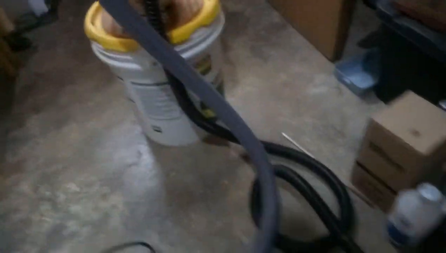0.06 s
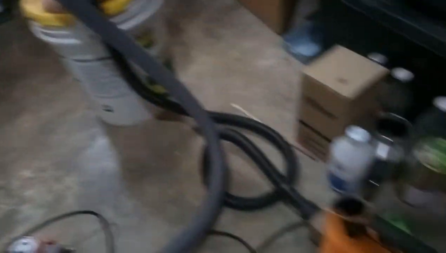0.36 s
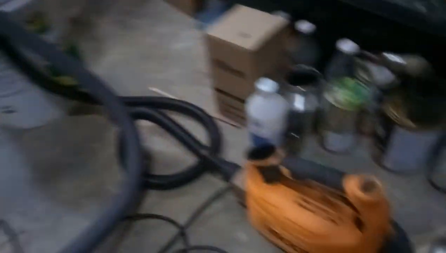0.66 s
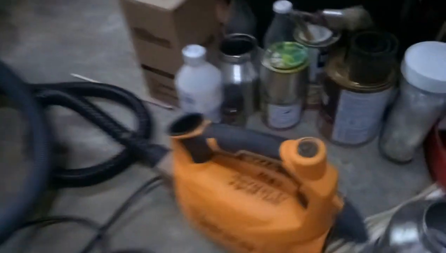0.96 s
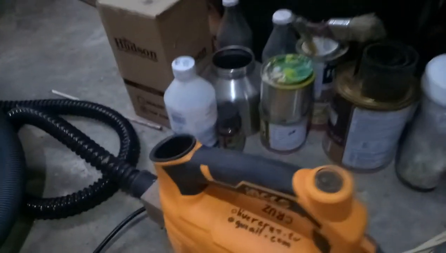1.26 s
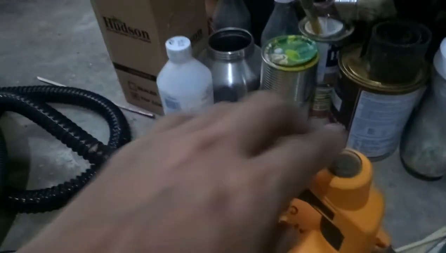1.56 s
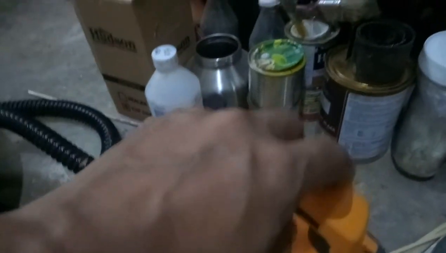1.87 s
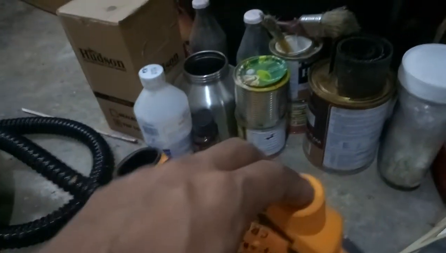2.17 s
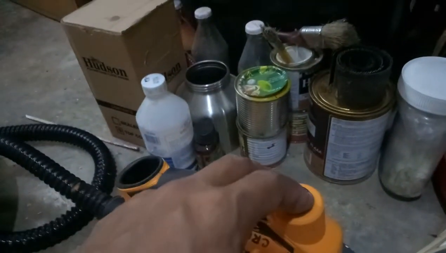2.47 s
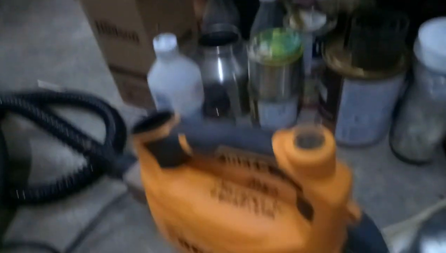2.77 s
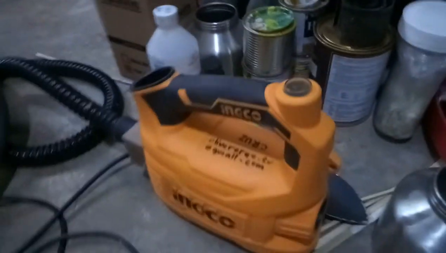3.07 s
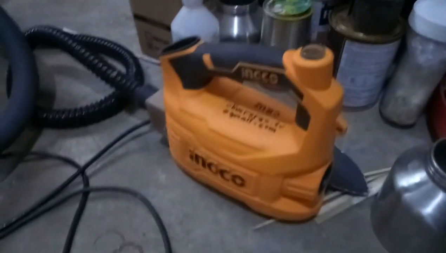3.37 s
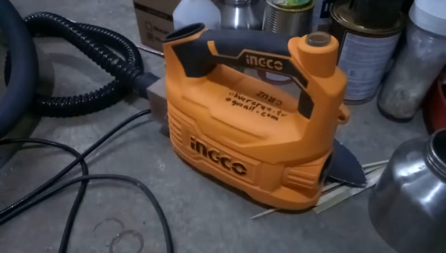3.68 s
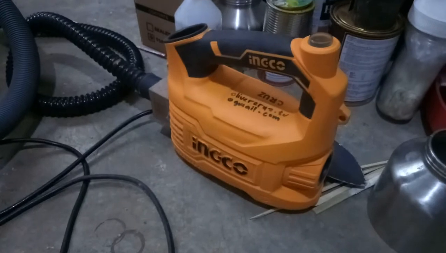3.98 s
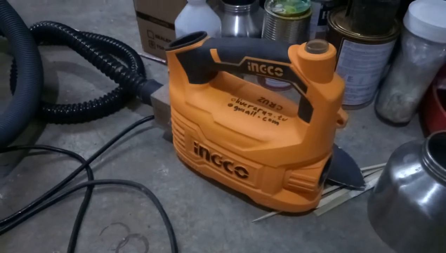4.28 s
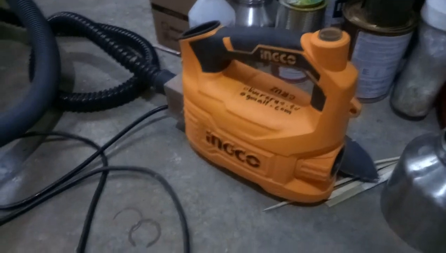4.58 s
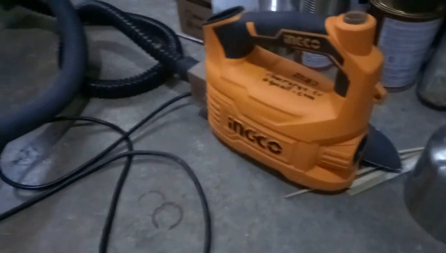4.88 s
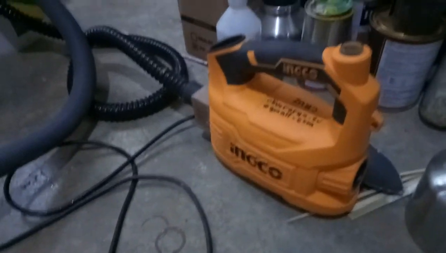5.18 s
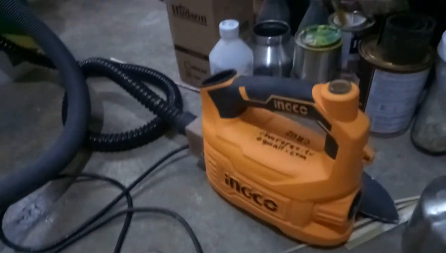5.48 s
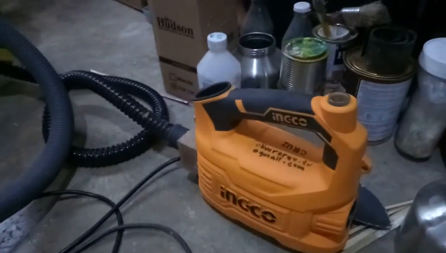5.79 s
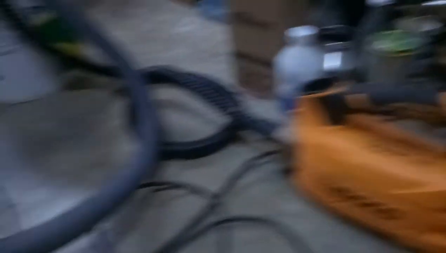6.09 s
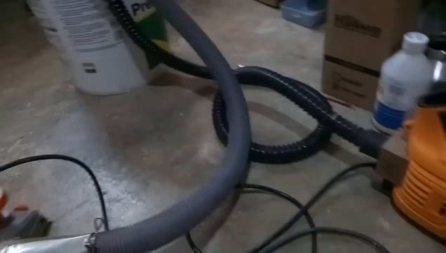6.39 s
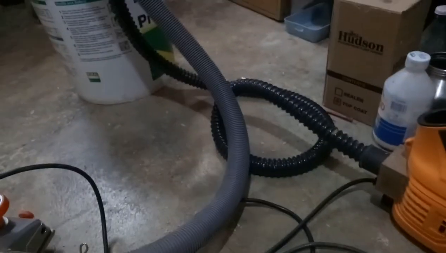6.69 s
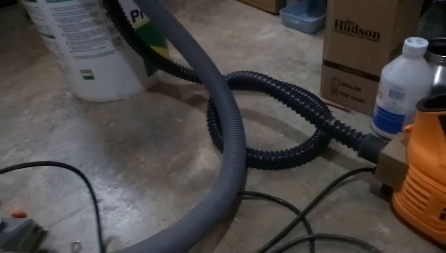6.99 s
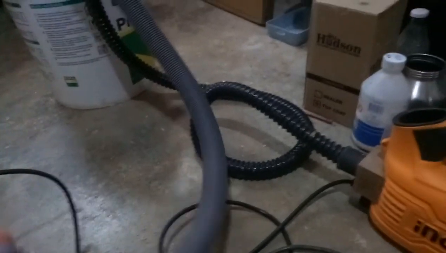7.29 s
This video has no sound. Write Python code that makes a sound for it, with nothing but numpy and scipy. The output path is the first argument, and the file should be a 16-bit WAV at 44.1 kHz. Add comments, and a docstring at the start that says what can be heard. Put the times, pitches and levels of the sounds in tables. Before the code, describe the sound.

A small electric blower, hosed up as a vacuum cleaner, starts after a quiet moment of shuffling, soft steps, mains buzz and a faraway engine. It clicks on with a brief raspy rising whir, then holds a steady whining tone over airy hiss. It is heard from nearby in a workshop on a hand-held microphone, whose late turn away shifts the hiss while the motor keeps running.

```python
"""Electric blower starting up

A hand-held blower, hosed to a bucket as a vacuum cleaner, is switched on in a small workshop, after
a mains buzz, a far idling engine and a shoe scuff. The commutator zips upwards under the inrush
current; then the unbalanced rotor sings at its shaft rate over turbulent air and brush hiss.
Near the end the listener, a hand-held pair of microphones, turns away and the case shades the hiss."""
import sys
import numpy as np
from scipy import signal
from scipy.fft import rfft, irfft, next_fast_len
from scipy.io import wavfile
from scipy.ndimage import map_coordinates

SR = 44100
rng = np.random.default_rng(int(sys.argv[2]) if len(sys.argv) > 2 else 0)


def bounce(signal):
    """Save signal as a 16-bit WAV file at the path given by the first command-line argument."""
    frames = np.transpose(np.atleast_2d(signal))
    limited = np.clip(frames, -1, 1)
    pcm = np.round(limited * 32767).astype(np.int16)
    wavfile.write(sys.argv[1], SR, pcm)


N = 332073
TIME = np.arange(N) / SR

SWITCH_S, FULL_HZ, BARS = 2.369, 583.4, 12  # switch-on, full shaft rate, commutator bars
HUM_HZ, HUM_CREST_S = 120, 2.458  # twice the mains rate, and one crest of its throb

# Spectra give densities per hertz. Levels are relative: each source applies its own gains.
# Third shaft harmonic in the room's standing waves: time_s, left_db, right_db, right_lead_rad
THIRD_HARMONIC = [(2.62, -31.5, -42, .8), (2.8, -24, -36, 2), (2.95, -29.5, -34, 2.2),
                  (3.35, -35.5, -33.5, 2.6), (4.45, -33, -32, 3.5), (4.85, -36.5, -35, 1.05),
                  (5.68, -34.5, -37.5, 1.4), (5.87, -34, -36, 3.3), (6.05, -24, -29, 2),
                  (6.4, -25.5, -48, 0.6), (7.53, -27.5, -42, .8)]
# Weaker shaft harmonics: multiple, left_db, right_db, turned_change_db
WEAK_HARMONICS = [(2, -41, -44.5, 1.5), (5, -50, -47, 1), (7, -42.5, -40, -5), (24, -65, -66, -7)]
# The listener's turn from the blower to the hoses: time_s, turned_share
LISTENER_TURN = [(5.85, 0.01), (6.35, 0.81)]
# Radiation of commutator tones by the case: pitch_hz, left_db, right_db
CASE_RESPONSE = [(600, -40, -42), (830, -24, -30), (1130, -18, -25), (1500, -25, -31), (2240, -23, -28),
                 (2750, -44, -40), (3100, -28, -21), (3320, -27, -14), (3530, -14.5, -10.5),
                 (3850, -29, -27), (4200, -22, -13.5), (4680, -29, -23), (5000, -42, -43), (5750, -54, -44),
                 (6350, -42, -46), (7200, -54, -60), (12000, -66, -68)]
# Overtones of the bar-passing tone: multiple, level_db
BAR_OVERTONES = [(2, -6), (3, -16), (4, -16)]
# Bar-passing whine at the moving listener: time_s, level_db
WHINE_LEVEL = [(2.62, -62), (2.75, -50), (2.83, -54), (2.94, -51), (3.05, -70), (4.55, -70), (4.8, -54),
               (5.2, -61), (5.85, -54), (6.3, -62), (7.4, -67)]
# Air in fan and hose, and the hose's hollow resonance: frequency_hz, left_db, right_db
RUSH_SPECTRUM = [(22, -12.5, -24.5), (45, -49, -36), (65, -35, -41.5), (108.7, -12.5, -16),
                 (178.7, 2, -3.5), (224, -4, -8), (308, 3, -1), (333, -6.5, -8.5), (422, -2, -16),
                 (478, -4.5, -3), (658, -3, -7), (880, -8.5, -12), (1140, -9.5, -24.5), (1970, -31.5, -26),
                 (5000, -100, -100)]
HOSE_SPECTRUM = [(600, -31, -33), (1120, -18.5, -15.5), (1680, -38.5, -43), (4000, -85, -86.5)]
# Hiss through the case: frequency_hz, left_db, right_db, left_turned_change_db, right_turned_change_db
HISS_SPECTRUM = [(950, -41.5, -56, 25, 4), (1365, -7.5, -26, -4, -15), (2220, -4, -6, 2.5, -5),
                 (2610, -14, -7, 4.5, -2), (3160, -16, -3.5, 10, 1), (3500, -11.5, -9, -21, -0.5),
                 (4100, -19.5, -4.5, 2, 3), (4600, -21, -9, 4, 0), (5450, -33, -15, -7, -2.5),
                 (6380, -17.5, -24.5, -4.5, 1.5), (7300, -54.5, -26, -6, -12), (8000, -45.5, -47, 9.5, -2),
                 (10780, -24.5, -28.5, -1, -4.5), (14600, -34, -40.5, -4, -3)]
# Phase lead of the hiss on the left, bent by floor and clutter: frequency_hz, facing_rad, turned_rad
HISS_LEAD = [(1000, -2.5, 1), (2200, -1, 2.6), (2770, -0.44, 1.9), (3500, 1.6, 2.6), (4300, .7, 1.9),
             (4800, 1, 2.7), (5950, 3.5, 3), (14000, 5, 3)]
# Resonances of vent and hose at the moving listener: time_s, centre_hz, left_db, right_db
VENT_RESONANCE = [(2.55, 4218, -42, -33), (3.2, 4080, -35.5, -31), (4.2, 4200, -39, -32.5),
                  (4.7, 4120, -36.5, -32.5), (5.35, 4180, -39, -33.5), (5.8, 4090, -42, -35),
                  (6.15, 4250, -47, -31), (6.52, 4520, -50, -35), (6.85, 4450, -50, -34.5),
                  (7.2, 4100, -50, -35.5)]
PIPE_RESONANCE = [(2.6, 1018, -45, -50), (3.1, 1150, -43, -46), (4.0, 1149, -43, -47),
                  (4.9, 1119, -35.5, -42), (5.8, 1149, -47, -45), (6.4, 1174, -38, -46)]
# Breathy hiss near 3.1 kHz that rises as the listener turns: time_s, centre_hz, left_db, right_db
RISING_BAND = [(3.0, 3100, -44, -44), (4.0, 3150, -45, -36.5), (4.55, 3128, -46, -34),
               (4.9, 3120, -51, -42), (5.399, 3165, -46, -46), (5.8, 2915, -53, -42), (6.1, 3090, -40, -32),
               (6.38, 3600, -54, -45), (6.6, 3690, -60, -58)]
# Sizzle around 6-8 kHz, brush sparks and the switch's crack: frequency_hz, left_db, right_db
SIZZLE_SPECTRUM = [(4000, -140, -140), (6350, -88.5, -92.5), (8320, -96.0, -94.0), (9100, -104, -104),
                   (15000, -140, -140)]
SPARK_SPECTRUM = [(500, -88, -90), (1050, -63, -70), (1500, -73, -80), (2250, -70, -74), (2800, -86, -84),
                  (3400, -81, -71), (3850, -87, -83), (4300, -82, -71), (5200, -99, -92),
                  (9000, -122, -120)]
CRACK_SPECTRUM = [(400, -84, -89), (950, -60, -65), (2400, -80, -82), (4300, -94, -80), (7500, -118, -116),
                  (14000, -132, -132)]
# The sizzle's beam at the moving listener: time_s, gain_db
SIZZLE_BEAM = [(2.6, 7), (3.2, -9.5), (4.4, -23), (4.8, 11), (5.9, 9), (6.4, 6)]
# Shoe scuffs, finger rubs, clothes rustles and footfalls: centre_s, length_s, level_db
SCUFF_STROKES = [(0.229, 0.012, 2.5), (.29, 0.16, -10), (.349, .01, -1), (.375, .07, -7), (0.42, 0.18, 2)]
RUB_STROKES = [(0.18, 0.18, -4.5), (0.75, 0.27, -11), (.98, 0.28, -17)]
CLOTH_STROKES = [(.27, 0.24, 1.5), (.62, 0.16, -8), (.88, 0.42, -6.5), (1.2, .25, -14), (1.66, 0.51, -11)]
STEP_STROKES = [(.73, .2, 0), (1.07, .14, -0.5)]
# Spectra of the same four contacts: frequency_hz, left_db, right_db
GRIT_SPECTRUM = [(300, -84, -98), (1200, -75.5, -90), (2300, -77.5, -82), (3400, -86, -75),
                 (4900, -93, -74.5), (6000, -94, -88), (7950, -107, -104), (14000, -106, -107)]
RUB_SPECTRUM = [(150, -95, -97), (230, -55, -61), (460, -78, -85), (604, -61, -67), (950, -79, -81),
                (2100, -91, -79), (3960, -120, -120)]
CLOTH_SPECTRUM = [(500, -85, -94), (900, -74, -76), (1400, -75, -89), (2320, -79, -78), (3000, -105, -94),
                  (7000, -125, -125)]
THUD_SPECTRUM = [(50, -79.5, -82.5), (85, -47, -55.5), (130, -75.5, -74), (330, -92, -94), (500, -69, -79),
                 (800, -99, -99), (1500, -130, -130)]
# Partials of an appliance's mains buzz: pitch_hz, level_db
BUZZ_PARTIALS = [(360.5, -45), (841, -66), (1081.5, -52), (1201.7, -62), (1321.8, -57), (1562.2, -56.5),
                 (1802.5, -58), (2042.8, -65)]
# Its upper partials at the moving listener: time_s, gain_db
BUZZ_TREBLE_GAIN = [(0, -7), (.5, -3.5), (.75, -8), (1.15, -8.5), (1.32, -4.5), (1.8, 0), (2.35, -2)]
# Partials of the far engine: pitch_hz, level_db, opening_lift_db
ENGINE_PARTIALS = [(63.7, -15.5, -5), (85, -16, -1), (104.4, -1, 4), (124, -9, 11.5), (165.5, -25, 3),
                   (184, -15, 4), (229.5, -17.5, 19)]
# Swells of the far engine: centre_s, length_s, level_db
ENGINE_SWELLS = [(.16, 0.42, -44), (.57, 0.19, -38), (.79, 0.24, -44), (1.17, .25, -49)]
# The room's low rumble and its air: frequency_hz, left_db, right_db
RUMBLE_SPECTRUM = [(25, -79.5, -83.5), (45, -70.5, -89), (89, -59, -65), (221, -67, -69.5),
                   (460, -76.5, -79.5), (730, -79, -79.5), (2500, -135, -135)]
AIR_SPECTRUM = [(497, -100, -100), (1010, -78, -81), (2020, -76.5, -89), (2860, -99, -86),
                (4500, -102, -86.5), (5480, -112, -99), (7400, -127, -125), (15000, -134, -134)]


def shaft_rate():
    """Exponential run-up in turns per second: a quick inrush kick, a slower rise, a slight late sag."""
    kick_share, kick_s, run_up_s = .28, .055, .196
    age = np.maximum(TIME - SWITCH_S, 0)
    shortfall = kick_share * np.exp(-age / kick_s) + (1 - kick_share) * np.exp(-age / run_up_s)
    sag_hz = .8 * np.clip(2 * (TIME - 6.3) + .5, 0, 1)
    return FULL_HZ * (1 - shortfall) - sag_hz


def rotor(hz, angle, turned):
    """Forced vibration: unbalance shakes the case once a turn; at speed the bearings add harmonics."""
    flutter_db = .5 * walk(8.2) + .59 * walk(35) + .97 * walk(140) + .45 * walk(3)
    note_db = stereo(-14.5, -20.5) + stereo(.17, -3) * turned + flutter_db
    tone = (hz / FULL_HZ) ** 1.8 * undb(note_db) * np.sin(angle + stereo(0, -.12))
    *third_db, lead = curve(THIRD_HARMONIC)
    tone += undb(np.array(third_db) + .58 * walk(45)) * np.sin(3 * angle + stereo(0, 1) * lead)
    ring_hz, half_width_hz = 1035, 63  # a case resonance, crossed on the way up
    for multiple, left_db, right_db, turned_db in WEAK_HARMONICS:
        onset = np.interp(hz, [450, 510] if multiple < 3 else [560, 580], [0, 1])
        ring_db = 8.5 * np.exp(-((multiple * hz - ring_hz) / half_width_hz) ** 2)
        for side, db in enumerate((left_db, right_db)):
            waver_db = 3.2 * walk(4) + 2 * walk(40)
            level = onset * undb(db + ring_db + turned_db * turned + waver_db)
            jitter = walk(1.977) + 1.1 * walk(60)
            tone[side] += level * np.sin(multiple * angle + jitter)
    return np.sqrt(2) * ramp(hz, 345, span=70) * tone


def commutator(hz, angle):
    """Periodic impact: bars rattle under the brushes, driven by an inrush that throbs with the mains."""
    current = np.clip(1 - hz / FULL_HZ, 0, 1) ** .47  # back voltage chokes it as speed rises
    bar_hz, bar_angle = BARS * hz, BARS * angle
    roughness = np.interp(hz, [90, 240], [.6, .3])
    zing_db = response(CASE_RESPONSE, bar_hz) + 4 * roughness * walk(300)
    zing = undb(zing_db) * np.sin(bar_angle + stereo(1, 0) + roughness * walk(700))
    overtones = 0
    for multiple, db in BAR_OVERTONES:
        level = undb(response(CASE_RESPONSE, multiple * bar_hz) + db)
        overtones += level * np.sin(multiple * bar_angle + roughness * walk(500))
    overtones *= np.interp(hz, [30, 100, 185, 260], [0, 1, 1, 0])
    rattle = np.sqrt(2) * current * throb(depth=.48) * (zing + overtones)
    return workshop(rattle, wet_db=-4, t60_s=.08) * (TIME > SWITCH_S)


def airflow(hz, turned):
    """Turbulence in fan and hose grows as a power of speed and is shaded as the listener turns."""
    drive = ramp(hz, 0, span=420) ** 1.9
    air = lagged(colour(noise_pair(apart=.05), RUSH_SPECTRUM), lag_ms=.12)
    rush = signal.sosfiltfilt(signal.butter(2, 500, fs=SR, output="sos"), air)
    whoosh = air - rush + colour(noise_pair(apart=.96), HOSE_SPECTRUM)
    gusts = undb(.5 * walk(14))
    return drive * gusts * (rush * undb(-49 - 3 * turned) + whoosh * undb(-47.5 - 4.5 * turned))


def brushes(hz, angle, turned):
    """Acoustic shadow: brush and vent hiss, pulsing once a turn, is recoloured as the listener turns."""
    drive = ramp(hz, 0, span=420) ** 1.7
    pulsing = drive * (1 + .17 * np.cos(angle)) * undb(.7 * walk(220) + .45 * walk(13))
    facing = phase_lagged(noise_pair(apart=.5) * pulsing, HISS_LEAD, column=0)
    away = phase_lagged(noise_pair(apart=.47) * pulsing, HISS_LEAD, column=1)
    facing = np.cos(turned * np.pi / 2) * colour(facing, HISS_SPECTRUM)
    away = np.sin(turned * np.pi / 2) * colour(away, HISS_SPECTRUM, turned=True)
    hiss = standing_waves(facing + away)
    treble = signal.sosfiltfilt(signal.butter(4, 6500, "high", fs=SR, output="sos"), hiss)
    treble_gain = drive ** 2 * undb(.5 + walk(2.09))  # the finest hiss needs high speed
    return (hiss + treble * (treble_gain - 1)) * undb(-56)


def breathy_band(hz, table, width_hz, left_lead_rad):
    """Narrow-band noise: hiss gathered about a wandering centre is heard as a breathy pitch."""
    centre_hz, *level_db = curve(table)
    centre_hz = centre_hz + .15 * width_hz * walk(9)
    noise = noise_pair(apart=.2) + 1j * noise_pair(apart=.2)
    breath = signal.sosfilt(signal.butter(2, width_hz / 2, fs=SR, output="sos"), noise)
    band = np.real(breath * np.exp(1j * (phase(centre_hz) + stereo(1, 0) * left_lead_rad)))
    return band / np.std(band) * undb(level_db) * ramp(hz, 300, span=130)


def coils(hz):
    """Magnetic force from the inrush current makes the field coils hum at twice the mains rate."""
    current = np.clip(1 - hz / FULL_HZ, 0, 1) ** .5 * ramp(TIME, SWITCH_S, span=.17)
    return np.sqrt(2) * undb(stereo(-30.5, -36)) * current * np.sin(2 * np.pi * HUM_HZ * TIME)


def sparks(hz):
    """Arcing at the brushes gives rough bursts of noise while the rotor is still slow."""
    slow = np.interp(hz, [0, 50, 220, 380], [0, 1, 1, 0])
    bursts = throb(depth=.5) * undb(3.5 * walk(450))
    return colour(noise_pair(apart=.33) * slow * bursts, SPARK_SPECTRUM)


def whine(hz, angle):
    """At speed the bars leave a thin tone at their passing rate, broadened by phase modulation."""
    scatter_rad = np.interp(hz, [560, 580], [.9, .35])
    tone = np.array([undb(3 * walk(25)) * np.sin(BARS * angle + walk(2) + scatter_rad * walk(160))
                     for side in range(2)])
    return np.sqrt(2) * undb(curve(WHINE_LEVEL)[0]) * ramp(hz, 380, span=60) * tone


def sizzle(hz):
    """Directivity: a band of sizzle around 6-8 kHz comes and goes as the listener moves."""
    band = colour(noise_pair(apart=.69), SIZZLE_SPECTRUM)
    return band * undb(curve(SIZZLE_BEAM)[0]) * ramp(hz, 300, span=200)


def switch():
    """Impact: the switch snaps shut with a plastic crack that decays exponentially."""
    age = np.maximum(TIME - SWITCH_S, 0)
    return colour(noise_pair(apart=.26) * (age > 0) * np.exp(-age / .065), CRACK_SPECTRUM)


def shoe():
    """Sliding friction: a sole clicks down, drags over gritty concrete and squeaks once."""
    grain_db = 2.6 * walk(600)
    grit = colour(noise_pair(apart=1) * strokes(SCUFF_STROKES) * undb(grain_db), GRIT_SPECTRUM)
    slip = ramp(TIME, .312, span=.02)
    squeak_hz = 3300 + 1100 * np.sin(slip * np.pi / 2)
    envelope = np.abs(np.sin(np.pi * slip)) ** .7 * undb(3 * walk(300))
    squeak = envelope * np.sin(phase(squeak_hz) + .5 * walk(900))
    return workshop(grit + squeak * undb(stereo(-44, -37)), wet_db=-6, t60_s=.4)


def handling():
    """Contact noise: fingers rub the microphones' housing, clothes rustle and feet come down softly."""
    rubs = colour(noise_pair(apart=.11) * strokes(RUB_STROKES) * undb(2 * walk(48.8)), RUB_SPECTRUM)
    cloth = colour(noise_pair(apart=.88) * strokes(CLOTH_STROKES) * undb(2 * walk(25)), CLOTH_SPECTRUM)
    cloth = standing_waves(cloth)
    steps = colour(noise_pair(apart=.05) * strokes(STEP_STROKES), THUD_SPECTRUM)
    return rubs + cloth + steps


def mains_buzz():
    """An appliance buzzes on harmonics of the rectified mains; the lowest grows as the listener nears."""
    near_db = np.interp(TIME, [0, 3.1], [-5, 0])
    treble_db = curve(BUZZ_TREBLE_GAIN)[0]
    buzz = 0
    for hz, db in BUZZ_PARTIALS:
        drift_db = near_db + .7 * walk(4.6) if hz < 500 else treble_db + 2 * walk(5.3)
        buzz += undb(db + drift_db) * np.sin(2 * np.pi * hz * TIME)
    return lagged(np.sqrt(2) * buzz * undb(stereo(1, -2.5)), lag_ms=-.1)


def far_engine():
    """An engine idling far outside radiates a low line spectrum that drones, swells and settles."""
    drone = np.interp(TIME, [.18, .5], [1, 0])
    idle = 0
    for hz, db, lift_db in ENGINE_PARTIALS:
        level = undb(db + lift_db * drone + .87 * walk(5.1))
        idle += level * np.sin(2 * np.pi * hz * TIME + .54 * walk(7))
    envelope = undb(-51) + strokes(ENGINE_SWELLS)
    return lagged(np.sqrt(2) * idle * envelope * undb(stereo(1, -2.5)), lag_ms=-.33)


def room_murmur():
    """Ambient noise: a nearly coherent rumble and diffuse air die down to a steady floor."""
    murmur_db = -4 + 8 * np.exp(-TIME / .93) + .48 * walk(11)
    rumble = lagged(colour(noise_pair(apart=.043), RUMBLE_SPECTRUM), lag_ms=-.36)
    air = colour(noise_pair(apart=1), AIR_SPECTRUM)
    return rumble * undb(murmur_db) + air * undb(.63 * murmur_db)


def workshop(x, wet_db, t60_s):
    """Reverberation: dense reflections from floor and clutter join the direct sound at constant power."""
    t = TIME[:SR // 2]
    tail = rng.standard_normal((2, len(t))) * undb(-60 * t / t60_s) * (t > .002)
    tail *= undb(wet_db) / np.sqrt(np.sum(tail ** 2, axis=1, keepdims=True))
    reflections = signal.fftconvolve(x, tail, axes=1)[:, :N]
    return (x + reflections) / np.sqrt(1 + undb(2 * wet_db))


def standing_waves(x, spacing_hz=210, changes_per_s=3.5):
    """Interference: neighbouring bands swell and sink at random as the listener moves about the room."""
    hz, s, bands = signal.stft(x, SR, nperseg=1024)
    field = rng.standard_normal((128, 64))
    grid = np.meshgrid(hz / spacing_hz, s * changes_per_s, indexing="ij")
    patches = map_coordinates(field, grid, order=3, mode="wrap")
    depth_db = 1.9 * np.interp(hz, [5000, 8000], [1, .4])[:, None]
    return signal.istft(bands * undb(depth_db * patches), SR)[1][:, :N]


def noise_pair(apart):
    """Partial coherence: white noise at two microphones; apart is the share of power not in common."""
    return np.sqrt(1 - apart) * rng.standard_normal(N) + np.sqrt(apart) * rng.standard_normal((2, N))


def colour(x, table, turned=False):
    """Filtering gives white noise a left and a right spectrum; turned adds the last two columns."""
    size = next_fast_len(N + 8192)
    db = response(table, np.arange(size // 2 + 1) * SR / size)
    gain = undb(db[:2] + turned * db[-2:])
    return irfft(rfft(x, size) * gain, size)[:, :N] * np.sqrt(SR / 2)


def lagged(x, lag_ms):
    """Path difference: the right side hears the sound later, or earlier if the lag is negative."""
    right = map_coordinates(x[1], [(TIME - lag_ms / 1000) * SR], order=3, mode="mirror")
    return np.array([x[0], right])


def phase_lagged(x, table, column):
    """Phase delay: the right side lags by an angle that depends on frequency."""
    size = next_fast_len(N + 8192)
    lag_rad = response(table, np.arange(size // 2 + 1) * SR / size)[column]
    return np.array([x[0], irfft(rfft(x[1], size) * np.exp(-1j * lag_rad), size)[:N]])


def throb(depth):
    """Amplitude modulation at twice the mains rate."""
    return 1 + depth * np.cos(2 * np.pi * HUM_HZ * (TIME - HUM_CREST_S))


def strokes(table):
    """Superposed half-cosine swells of force."""
    return sum(undb(db) * np.cos(np.pi * np.clip((TIME - centre_s) / length_s, -.5, .5))
               for centre_s, length_s, db in table)


def walk(rate_hz):
    """Smooth random fluctuation with a spread of about one."""
    knots = rng.standard_normal(4096)
    coarse = map_coordinates(knots, [TIME[::64] * rate_hz], order=3, mode="wrap")
    return np.interp(TIME, TIME[::64], coarse)


def curve(table):
    """A table's columns, interpolated in time."""
    time_s, *columns = np.transpose(table)
    return np.array([np.interp(TIME, time_s, column) for column in columns])


def response(table, hz):
    """A spectrum's columns, interpolated in log frequency."""
    points_hz, *columns = np.transpose(table)
    log_hz = np.log(np.maximum(hz, 1))
    return np.array([np.interp(log_hz, np.log(points_hz), column) for column in columns])


def phase(hz):
    """Phase in radians is the integral of frequency."""
    return 2 * np.pi * np.cumsum(hz) / SR


def ramp(x, start, span):
    """A linear rise from 0 to 1 as x passes through span."""
    return np.clip((x - start) / span, 0, 1)


def stereo(left, right):
    """One value for each side."""
    return np.array([[left], [right]])


def undb(db):
    """Decibels to amplitude ratio."""
    return 10 ** (np.asarray(db) / 20)


def scene():
    """Superposition: one shaft drives the motor and air sounds, which add to those of the workshop."""
    hz = shaft_rate()
    angle = phase(hz * (1 + .0005 * walk(25)))
    turned = curve(LISTENER_TURN)[0]
    motor = coils(hz) + rotor(hz, angle, turned) + commutator(hz, angle) + sparks(hz) + whine(hz, angle)
    vent = breathy_band(hz, VENT_RESONANCE, width_hz=230, left_lead_rad=.8 + 1.3 * turned)
    rising_hiss = breathy_band(hz, RISING_BAND, width_hz=190, left_lead_rad=-1.5)
    pipe = breathy_band(hz, PIPE_RESONANCE, width_hz=90, left_lead_rad=.2)
    air = airflow(hz, turned) + brushes(hz, angle, turned) + vent + rising_hiss + pipe + sizzle(hz)
    return motor + air + switch() + shoe() + handling() + mains_buzz() + room_murmur() + far_engine()


def record(dry):
    """Band limiting: a steep low-pass removes the treble above 15.3 kHz."""
    return signal.sosfilt(signal.ellip(10, .1, 80, 15300, fs=SR, output="sos"), dry)


dry = scene()
out = record(dry)
bounce(out)
```